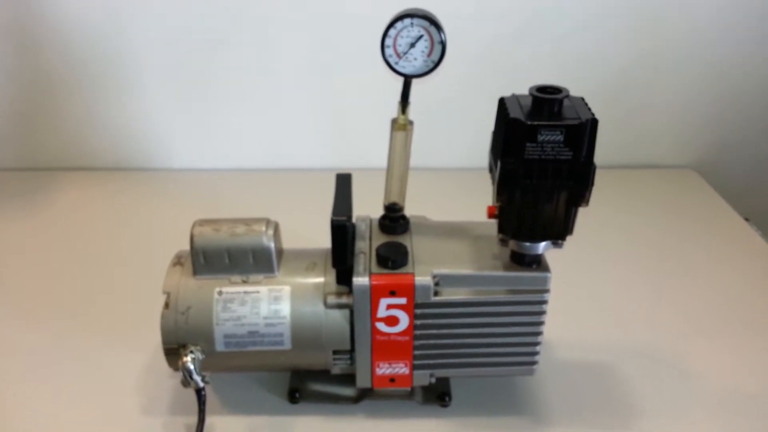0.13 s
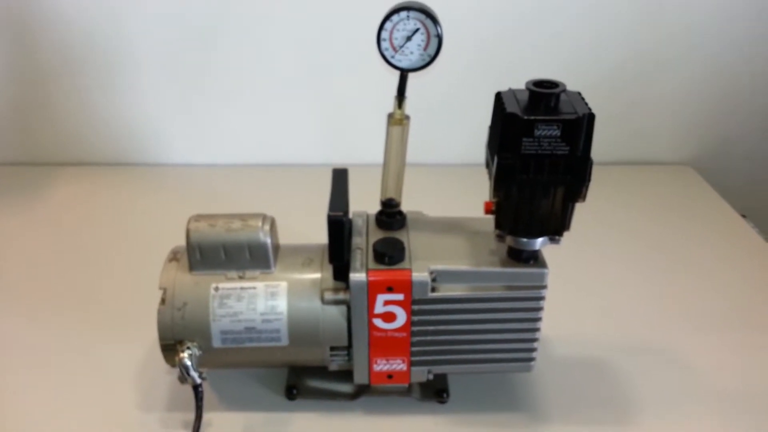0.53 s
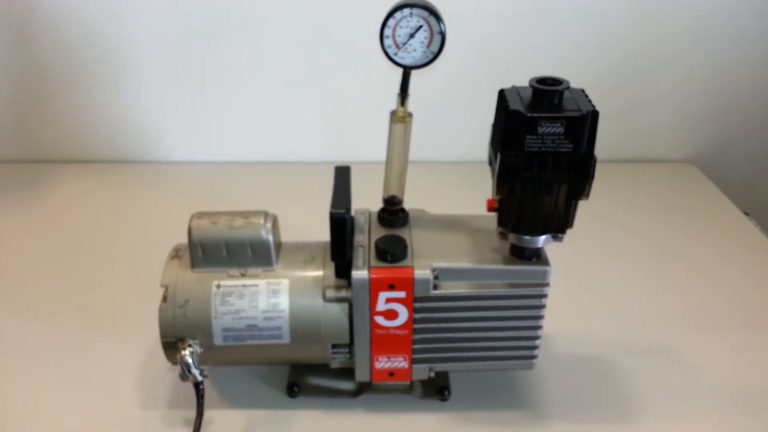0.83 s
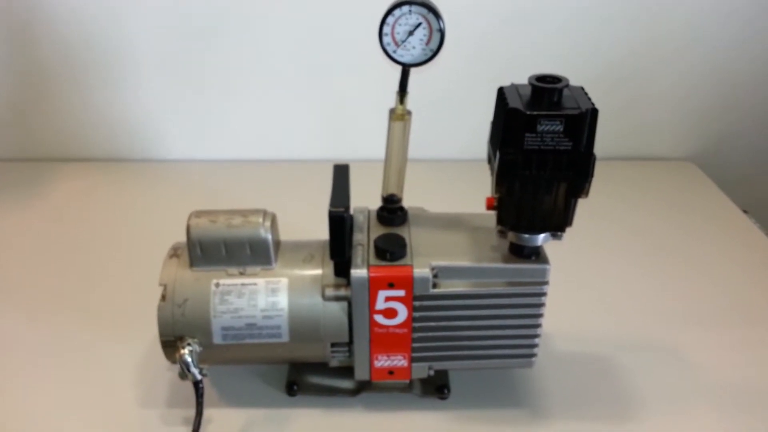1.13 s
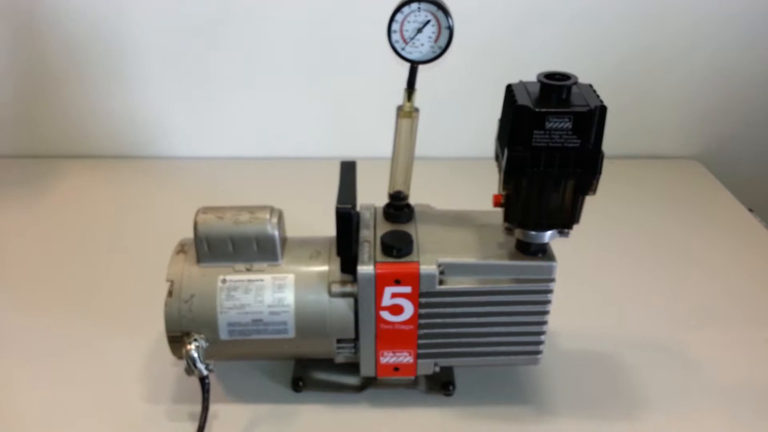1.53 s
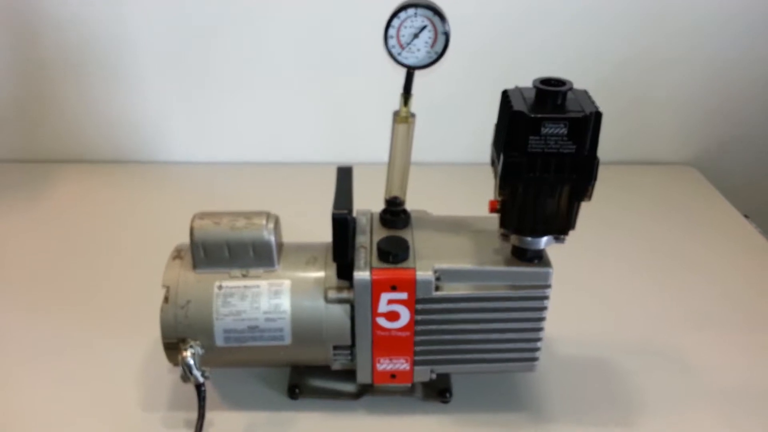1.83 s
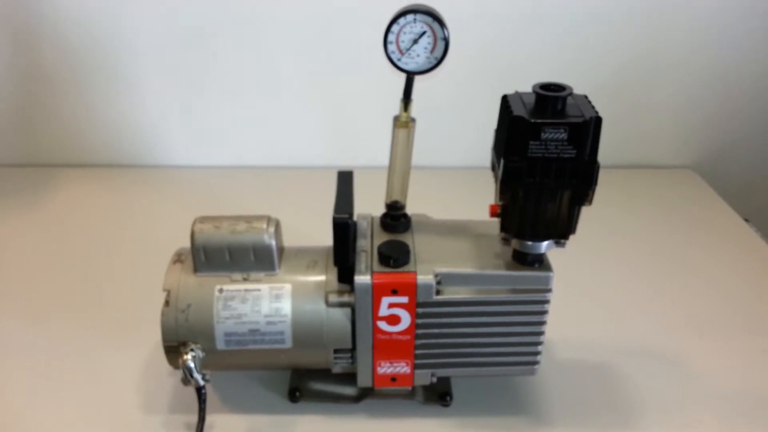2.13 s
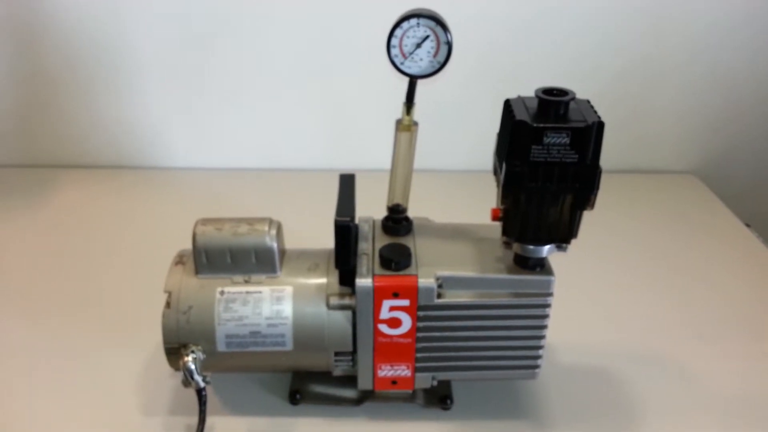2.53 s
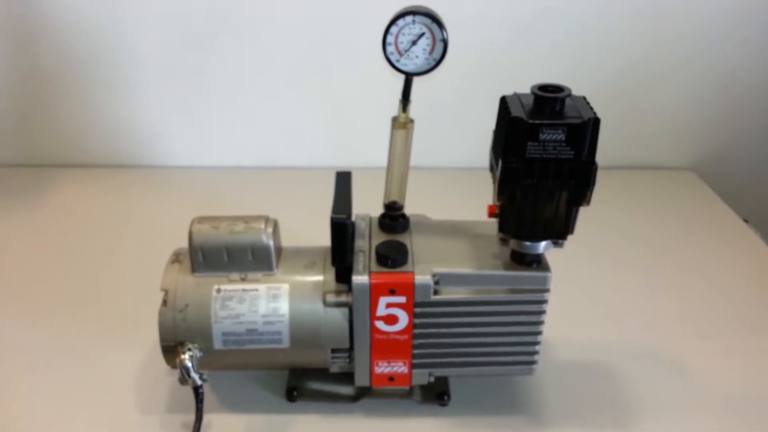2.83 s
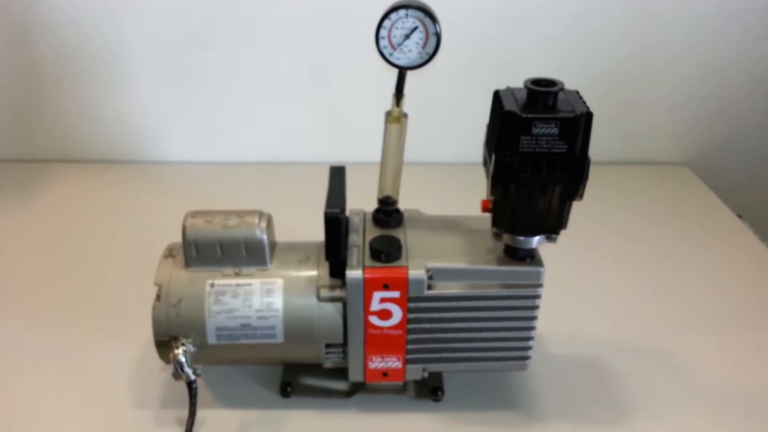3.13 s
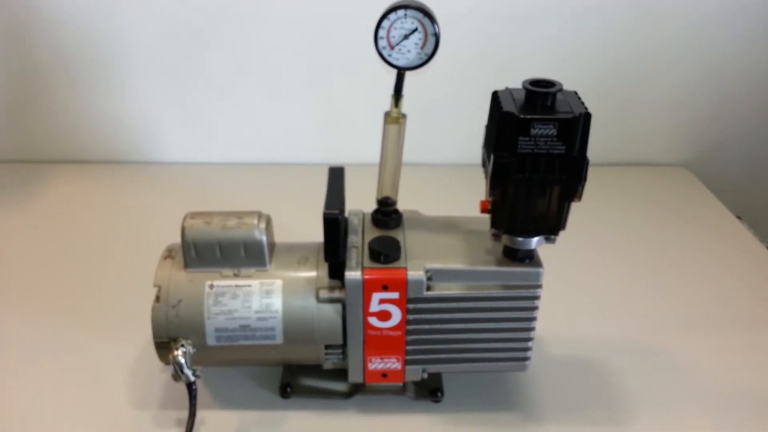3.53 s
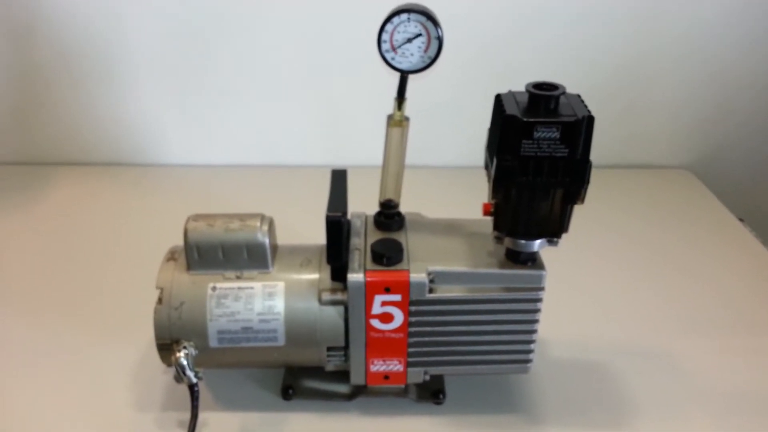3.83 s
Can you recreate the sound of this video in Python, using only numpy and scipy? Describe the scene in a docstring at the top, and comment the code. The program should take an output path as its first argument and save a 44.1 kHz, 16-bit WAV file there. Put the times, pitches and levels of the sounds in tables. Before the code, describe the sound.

A small vacuum pump hums and hisses steadily, then winds down with a sharp click.

```python
"""A quiet room, where a small rotary-vane vacuum pump runs on a table. Magnetic force drives a hum, shaft
and bearing add harmonic tones, and the vanes pulse a hiss in the casing. The power is cut and the rotor
coasts down; the motor's starting switch chatters and snaps shut, and the metal rings in its normal modes.
A faint, pulsing room tone emerges as the pump falls quiet, and a small squeak comes last.
The right microphone port is far more sensitive than the left around 3-4 kHz."""
import sys
import numpy as np
from scipy import signal
from scipy.fft import rfft, irfft
from scipy.io import wavfile
from scipy.ndimage import uniform_filter1d

SR = 44100
rng = np.random.default_rng(int(sys.argv[2]) if len(sys.argv) > 2 else 0)


def generate_wav(sig):
    """Save sig (samples, or channels by samples) to the path in sys.argv[1] as 16-bit PCM at SR."""
    pcm = np.round(np.clip(np.atleast_2d(sig).T, -1, 1) * 32767).astype(np.int16)
    wavfile.write(sys.argv[1], SR, pcm)


N = 176400
T = np.arange(N) / SR
HZ = np.fft.rfftfreq(N, 1 / SR)
HUM_HZ, SHAFT_HZ, BALL_PASS_HZ = 119.99, 29.244, 253.83
CAGE_HZ = BALL_PASS_HZ / 14
OFF_S, SNAP_S = 3.089, 3.3433


def amp(db):
    """Amplitude ratio of a level in decibels."""
    return 10 ** (np.asarray(db) / 20)


def curve(points):
    """Rows of (Hz, value) interpolated over log frequency onto every spectral bin."""
    hz, value = np.transpose(points)
    return np.interp(np.log(HZ + 1), np.log(hz + 1), value)


def decay(start, t60):
    """Free decay: zero before start, then a fall of 60 dB every t60 seconds."""
    return (T >= start) * amp(-60 * np.maximum(T - start, 0) / t60)


def bump(centre_s, width_s):
    """A Gaussian envelope."""
    return np.exp(-.5 * ((T - centre_s) / width_s) ** 2)


def wander(samples):
    """Twice-smoothed noise of unit standard deviation."""
    x = uniform_filter1d(uniform_filter1d(rng.standard_normal(N), samples), samples)
    return x / x.std()


def resonate(x, hz, width_hz):
    """Forced response of a damped resonator with unit peak gain."""
    carrier, pole = np.exp(2j * np.pi * hz * T), np.exp(-np.pi * width_hz / SR)
    return 2 * (carrier * signal.lfilter([1 - pole], [1, -pole], x / carrier)).real


def ports(right, unrelated, coherence, balance, lead_rad):
    """Partial coherence: the left port hears a filtered blend of the right's sound and an unrelated one."""
    shared = np.clip(curve(coherence), 0, 1)
    blend = shared * rfft(right) + np.sqrt(1 - shared ** 2) * rfft(unrelated)
    left = blend * amp(curve(balance)) * np.exp(1j * lead_rad)
    return np.array([irfft(left, N), right])


def mains_hum():
    """Forced vibration at twice the mains frequency; once free, frame and table modes beat and decay."""
    # Each row: natural frequency in Hz, bandwidth in Hz, relative level in dB, polarity.
    modes = [(128.7, 9, -2, -1), (107, 8, 0, 1)]
    free_s, out = np.maximum(T - OFF_S, 0), 0
    for hz, width_hz, db, polarity in modes:
        response = polarity * amp(db - 35) / (1 + 2j * (HUM_HZ - hz) / width_hz)
        cycles = HUM_HZ * (T - OFF_S - free_s) + hz * free_s + .42  # the cut falls .42 into a cycle
        out += np.sqrt(2) * (response * np.exp(2j * np.pi * cycles - np.pi * width_hz * free_s)).real
    return out


def rotor_tones(clock, cage_swing):
    """Periodic forces give harmonics and sidebands, which sag and fade as the rotor coasts."""
    # Each row: multiple of the shaft rate, level in dB.
    shaft = [(2, -69.1), (8, -79.6), (10, -74.4), (12, -64.4), (20, -78.6), (22, -79.2), (24, -77.7),
             (26, -77.8), (27, -81.1), (28, -72.1), (30, -80.9), (32, -81.3), (33, -82.2), (34, -75.3),
             (36, -80.1), (38, -79.1), (39, -87.2), (44, -84.2), (46, -79.4), (48, -76.8), (49, -81.3),
             (50, -67.3), (52, -85.7), (55, -84.4), (56, -81.1), (63, -77.6), (64, -76.5), (66, -79.8),
             (68, -79.4), (70, -71.3), (72, -76.4), (78, -76.9), (80, -73.0), (82, -81.3), (84, -82.3),
             (90, -74.0), (94, -76.8), (98, -80.9), (100, -72.0), (108, -71.0), (112, -71.0), (110, -67.0),
             (118, -72.9), (120, -66.0), (122, -69.0), (128, -66.4), (130, -65.0), (138, -71.0),
             (144, -68.5), (175, -71.1), (176, -74.0)]
    # Each row: multiple of the ball pass rate, level in dB.
    bearing = [(2, -74.0), (3, -80.0), (4, -80.7), (6, -85.4), (8, -79.8), (10, -76.9), (11, -71.2),
               (12, -75.8), (13, -62.3), (14, -56.4), (15, -65.5)]
    # Each row: multiple of the hum frequency, multiple of the shaft rate added, level in dB.
    magnetic = [(1, -1, -65), (1, 1, -75), (2, 0, -77), (3, 0, -67)]
    # Each row: multiple of the cage rate, multiple of the shaft rate added, level in dB.
    sidebands = [(218, -1, -69), (217, 0, -68), (216, 1, -66), (240, 0, -75), (268, 1, -75), (268, 2, -77)]
    knots_s, waver_db = np.linspace(0, T[-1], num=25), 1.7

    def partial(hz, db, phase_spread=10):
        """A sinusoid of wavering level whose starting phase is scattered by phase_spread cycles."""
        cycles = hz * clock + phase_spread * rng.standard_normal()
        waver = np.interp(T, knots_s, rng.standard_normal(len(knots_s)))
        return np.sqrt(2) * amp(db + waver_db * waver) * np.cos(2 * np.pi * cycles)

    out = sum(partial(k * SHAFT_HZ, db) for k, db in shaft)
    balls = sum(partial(k * BALL_PASS_HZ, db, phase_spread=0) for k, db in bearing)
    out += balls * (1 + .38 * cage_swing)  # one throb for each turn of the cage
    out += sum(partial(m * HUM_HZ + k * SHAFT_HZ, db) for m, k, db in magnetic)
    out += sum(partial(m * CAGE_HZ + k * SHAFT_HZ, db) for m, k, db in sidebands)
    return out * np.where(T < OFF_S, 1, decay(OFF_S, t60=.4))


def casing_hiss(clock, cage_swing):
    """Amplitude modulation: two vanes pulse the casing's noise, and the cage makes one band of it chug."""
    # Each row: frequency in Hz, spectral density in dB.
    spectrum = [(20, -115), (40, -103), (60, -92), (120, -82), (200, -91.5), (350, -91.5), (500, -93.5),
                (560, -93), (800, -94.5), (1200, -95), (2000, -92), (3050, -90.5), (3300, -82), (3950, -83),
                (4150, -87.5), (4550, -88.5), (4750, -89.5), (5000, -87), (5250, -85.5), (5450, -82),
                (5650, -87), (6300, -93), (6700, -94), (7300, -106), (8000, -104), (9000, -112),
                (14000, -114), (14900, -108)]
    # Each row: time in seconds, bass gain in dB, treble gain in dB.
    run_down = [(0, -0.5, 1.1), (1.2, 0.5, 0.1), (3.09, 1, 0), (3.18, 1.5, -4), (3.256, -7, -12.5),
                (3.275, -7.5, -4.5), (3.33, -12.5, -8), (3.44, -16, -21), (3.55, -16, -23),
                (3.62, -30, -25), (3.7, -35, -45), (4, -39, -54)]
    times, bass_db, treble_db = np.transpose(run_down)
    grit_db = 1.5 * uniform_filter1d(rng.standard_normal(N), size=200) * np.sqrt(200)
    noise = rfft(rng.standard_normal(N) * amp(grit_db)) * amp(curve(spectrum)) * np.sqrt(SR / 2)
    low_band = 1 / (1 + (HZ / 1340) ** 2)
    bearing_band = np.exp(-((HZ - 3600) / 500) ** 4)
    bass = irfft(noise * low_band, N) * amp(np.interp(T, times, bass_db))
    chug = .22 * cage_swing * irfft(noise * bearing_band, N)
    treble = (irfft(noise * (1 - low_band), N) + chug) * amp(np.interp(T, times, treble_db))
    vane_pulse = 1 + .042 * np.cos(4 * np.pi * SHAFT_HZ * clock - 2.7)
    return vane_pulse * (bass + treble)


def room_air():
    """The noise floor: room air and microphone noise, partly coherent between the ports in the bass."""
    # Each row: frequency in Hz, relative spectral density in dB.
    spectrum = [(15, -43), (25, 5.5), (251, -10.5), (272, -23), (303, -4.5), (337, -19), (386, -5.5),
                (518, -16), (935, -18), (1010, -18), (15200, -31)]
    # Each row: frequency in Hz, coherence between the ports.
    coherence = [(60, 0.42), (240, 0.71), (940, -0.027), (3730, -0.039), (14800, -0.22)]
    # Each row: frequency in Hz, left level over right in dB.
    balance = [(60, 0), (180, 0.5), (540, 0), (1630, -4), (4910, -0.5), (14800, -1)]
    right, unrelated = irfft(rfft(rng.standard_normal((2, N))) * amp(curve(spectrum)), N)
    return amp(-68.5) / right.std() * ports(right, unrelated, coherence, balance, lead_rad=0)


def starting_switch():
    """Impact excitation: the weights knock the switch's modes, the contacts rub, the room reverberates."""
    # Each row: start in seconds, level in dB with the energy spread over 5 ms, burst T60 in seconds.
    knocks = [(3.267, -60, .03), (3.283, -57, .04), (3.301, -70, 0.027), (3.344, -29.5, 0.015),
              (3.3465, -35.5, 0.027), (3.3522, -34.5, 0.028)]
    # Each row: frequency in Hz, bandwidth in Hz, gain in dB.
    modes = [(987, 90, -14), (1285, 100, -8), (1850, 120, -19), (2133, 110, -17), (2550, 130, -12),
             (3000, 200, -16), (3300, 150, -10), (3560, 120, 0), (3800, 120, -4), (4300, 250, -14),
             (5080, 260, -7), (5500, 200, -14), (5950, 250, -11), (6700, 130, -12), (8250, 250, -18)]
    out, rise_s = np.zeros(N), .0004
    for start, db, t60 in knocks:
        burst = rng.standard_normal(N) * np.clip((T - start) / rise_s, 0, 1) * decay(start, t60)
        burst[round(start * SR) + 10] += amp(11)  # the click of contact
        crack = amp(-30) * signal.lfilter(*signal.butter(2, 2470, "high", fs=SR), burst)
        ring = sum((-1) ** k * amp(gain_db) * resonate(burst, hz, width_hz)
                   for k, (hz, width_hz, gain_db) in enumerate(modes))
        knock = crack + ring
        out += amp(db) * knock * np.sqrt(.005 * SR) / np.linalg.norm(knock)
    rub = resonate(rng.standard_normal(N), hz=4930, width_hz=430)
    out += amp(-54) * rub / rub.std() * decay(SNAP_S, t60=.38)
    room_tail = (rng.standard_normal(N) * decay(.0054, t60=.25))[:SR // 2]
    return out + amp(-12.5) * signal.fftconvolve(out, room_tail / np.linalg.norm(room_tail))[:N]


def body_thump(centre_s=3.27, hz=80):
    """A low wave packet: the body rocks once on its feet."""
    return amp(-59) * bump(centre_s, width_s=.009) * np.cos(2 * np.pi * hz * (T - centre_s))


def casing_ring_and_room_tone():
    """Free vibration rings on in the casing after the snap; a faint, pulsing room tone emerges."""
    # Each row: frequency in Hz, level in dB, T60 in seconds, rise time in seconds.
    # The two rows near 940 Hz beat to give the room tone; the others are the casing's modes.
    partials = [(510, -72, .5, .02), (934, -74.5, 5.0, .13), (946, -82, 5.0, .13), (1249, -68, .4, .02),
                (1744, -65, .55, .05), (1820, -67, 2.0, .045), (2632, -58, .2, .015),
                (3572, -62, 1.0, .015), (4667, -58, .75, .015), (5090, -62, .6, .015)]
    out, waver_db = np.zeros(N), 2.5
    for hz, db, t60, rise_s in partials:
        envelope = (1 - np.exp(-((T - SNAP_S) / rise_s) ** 2)) * decay(SNAP_S, t60)
        out += amp(db + waver_db * wander(samples=900)) * envelope * np.sin(2 * np.pi * hz * T)
    return out


def squeak_and_rustle():
    """A brief tone and a swell of band noise, heard as a faint squeak and rustle."""
    squeak = amp(-66.5) * bump(3.958, width_s=.011) * np.sin(2 * np.pi * 3506 * T)
    band = resonate(rng.standard_normal(N), hz=3600, width_hz=1800)
    return squeak + amp(-67.46) * bump(3.97, width_s=.042) * band


def scene():
    """Superposition at two ports: tones arrive fully coherent, hiss and knocks only partly so."""
    # Each row: frequency in Hz, coherence between the ports.
    coherence = [(60, 0.58), (200, 1), (700, 0.85), (1300, 0.49), (2400, 0.34), (4400, 0.63), (8000, 0.12),
                 (15000, 0.15)]
    # Each row: frequency in Hz, left level over right in dB.
    balance = [(60, 3.5), (87, -3.5), (130, -1), (180, 0), (260, -2.5), (380, 0.5), (540, -2.5), (780, 0.5),
               (1130, -7), (1630, -4.5), (2360, -11), (3400, -20.5), (4910, -14), (7090, -0.5), (10200, 0),
               (14800, -4)]
    # Each row: frequency in Hz, phase lead of the left port in radians.
    lead = [(60, -.08), (350, -.04), (1460, -.35), (2330, -.6), (3550, 1.8), (4820, 2.5), (5250, 5.5),
            (5940, 6.8), (9000, 9.9)]
    slowing_per_s = 1.2  # share of full speed lost each second after the cut
    clock = T - .5 * slowing_per_s * np.maximum(T - OFF_S, 0) ** 2  # rotation, in seconds at full speed
    cage_swing = -np.cos(2 * np.pi * CAGE_HZ * clock)
    tonal = mains_hum() + rotor_tones(clock, cage_swing)
    tonal += body_thump() + casing_ring_and_room_tone() + squeak_and_rustle()
    right, unrelated = (casing_hiss(clock, cage_swing) + starting_switch() for _ in range(2))
    noisy = ports(right, unrelated, coherence, balance, curve(lead))
    coherent = ports(tonal, tonal, [(0, 1), (SR / 2, 1)], balance, curve(lead))
    return noisy + coherent + room_air()


def record(dry):
    """Band limiting: the microphone cuts the deep bass, and a steep low-pass removes the top treble."""
    bass_cut = signal.lfilter(*signal.butter(2, 45.2, "high", fs=SR), dry)
    low_pass = signal.firwin(511, 15250, window=("kaiser", 9), fs=SR)
    return signal.oaconvolve(bass_cut, low_pass[None], "same")


dry = scene()
out = record(dry)
generate_wav(out)
```